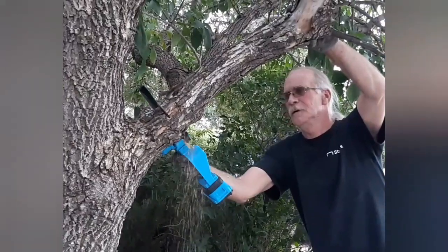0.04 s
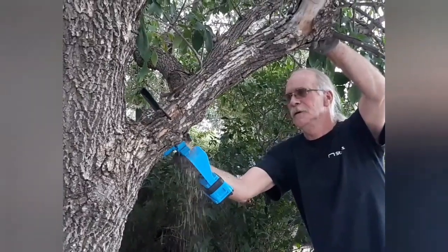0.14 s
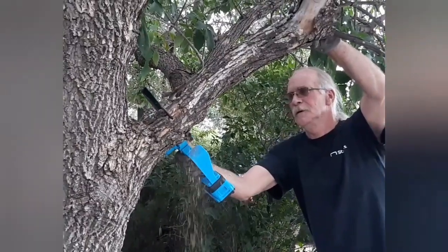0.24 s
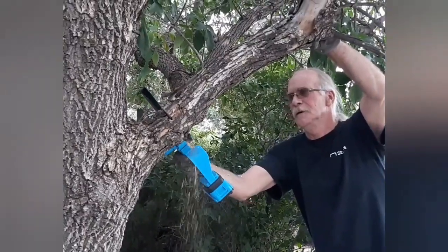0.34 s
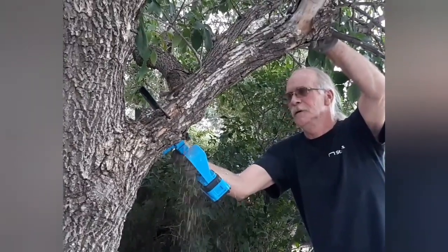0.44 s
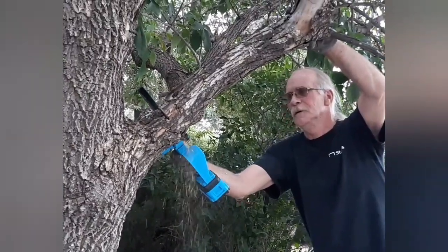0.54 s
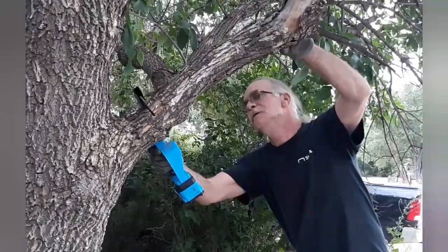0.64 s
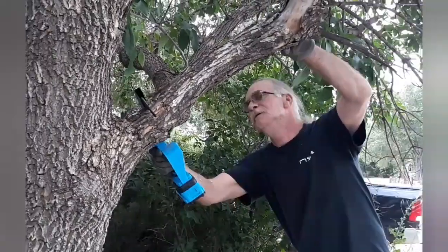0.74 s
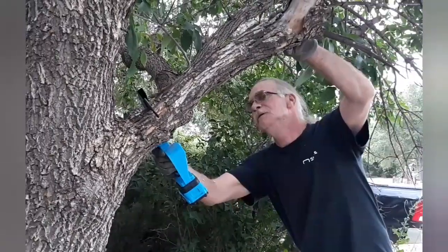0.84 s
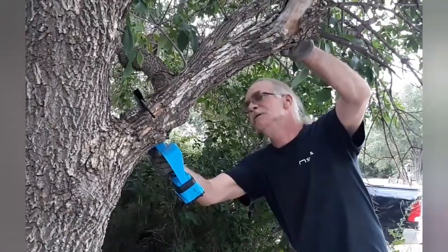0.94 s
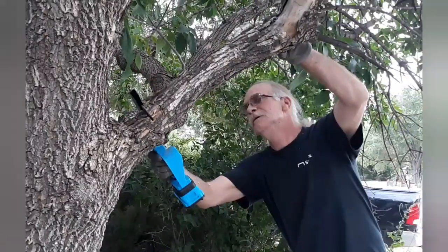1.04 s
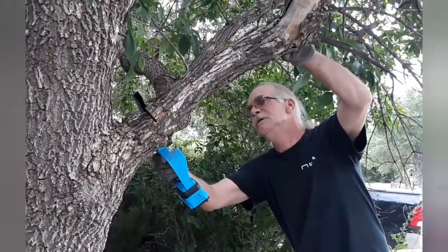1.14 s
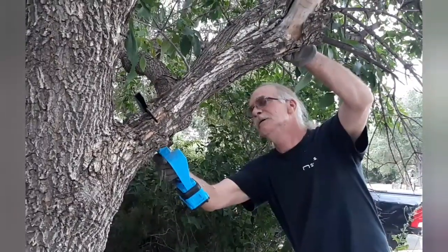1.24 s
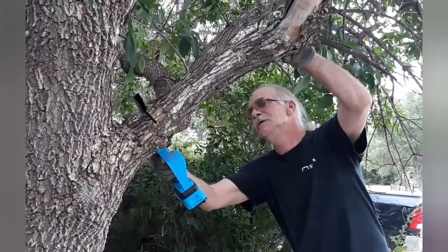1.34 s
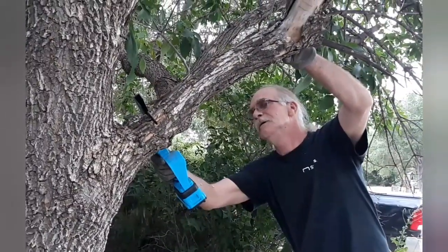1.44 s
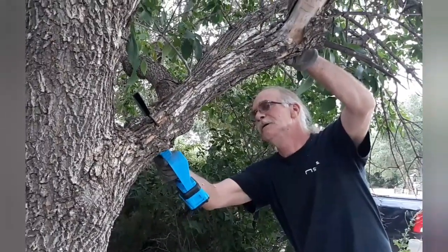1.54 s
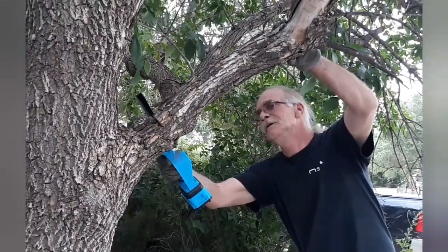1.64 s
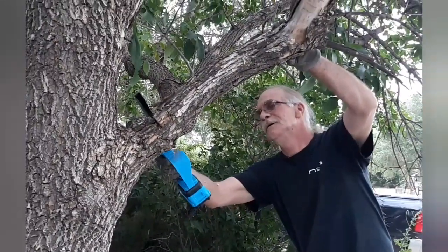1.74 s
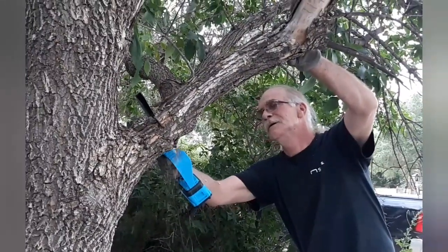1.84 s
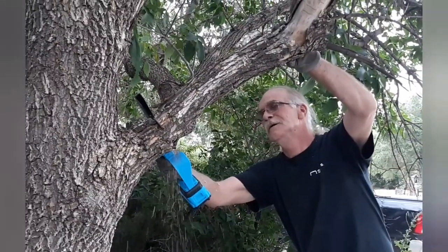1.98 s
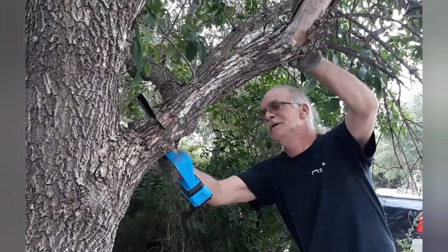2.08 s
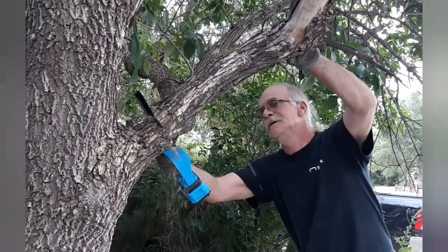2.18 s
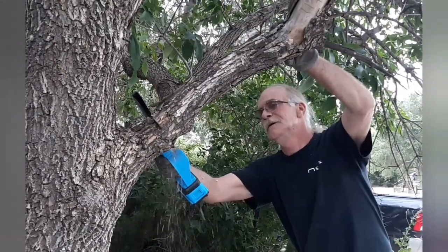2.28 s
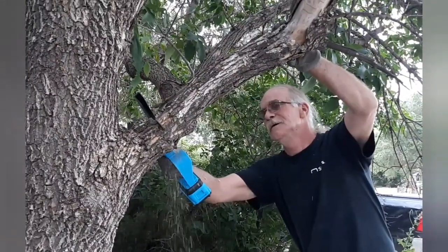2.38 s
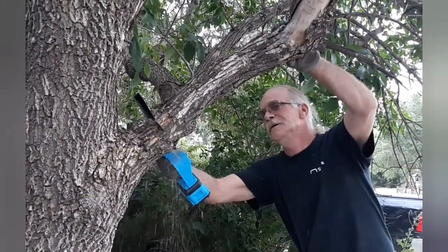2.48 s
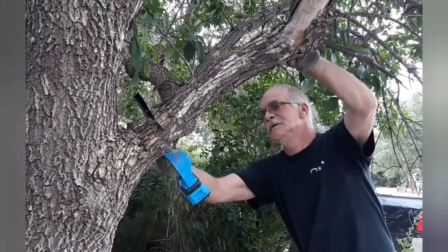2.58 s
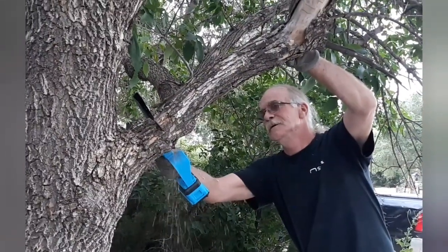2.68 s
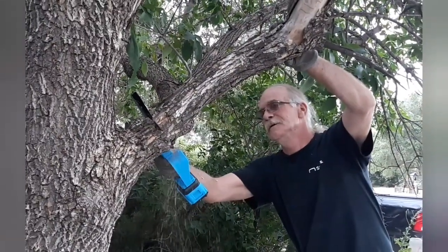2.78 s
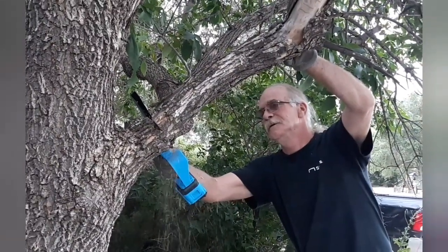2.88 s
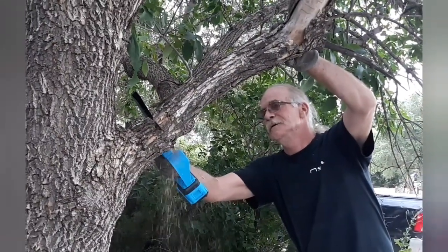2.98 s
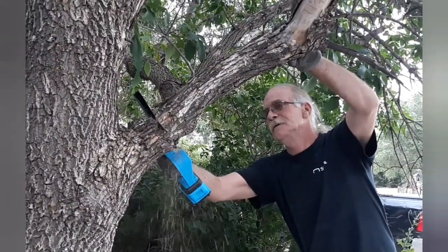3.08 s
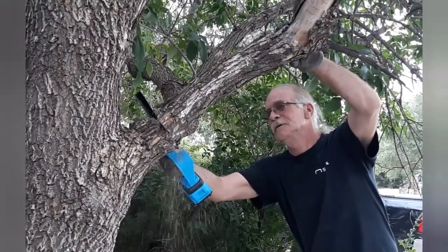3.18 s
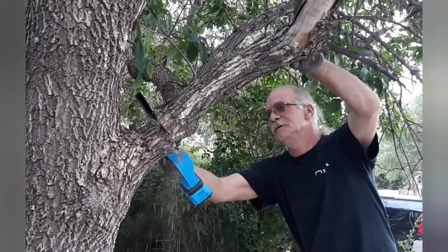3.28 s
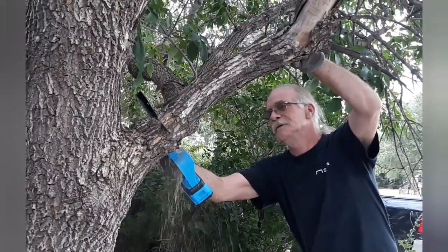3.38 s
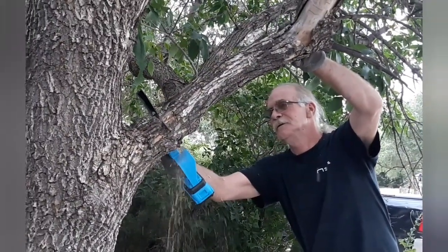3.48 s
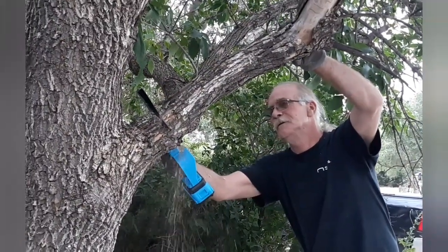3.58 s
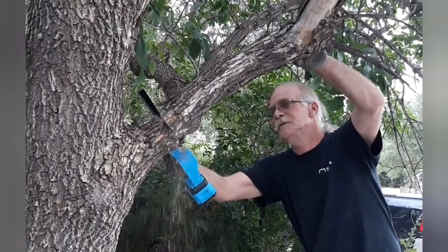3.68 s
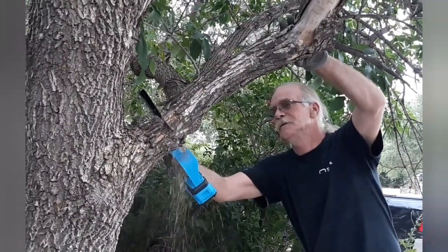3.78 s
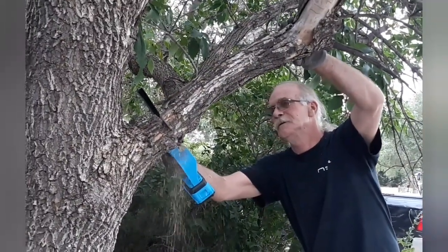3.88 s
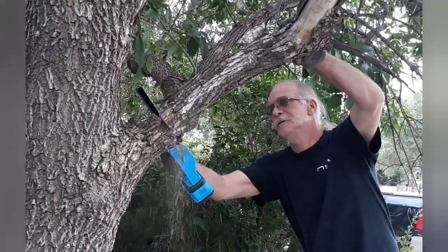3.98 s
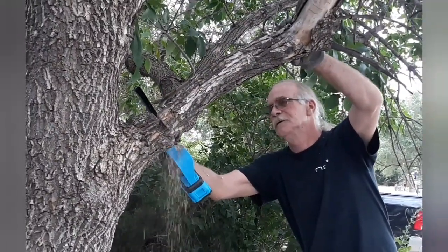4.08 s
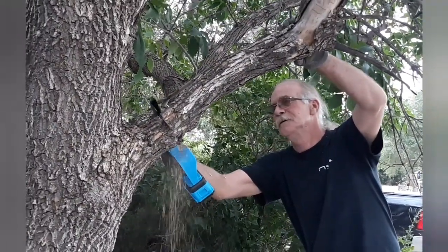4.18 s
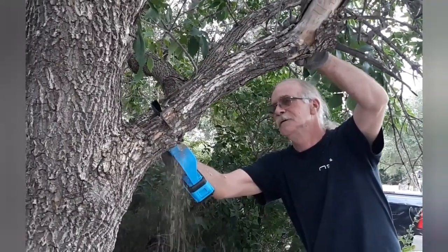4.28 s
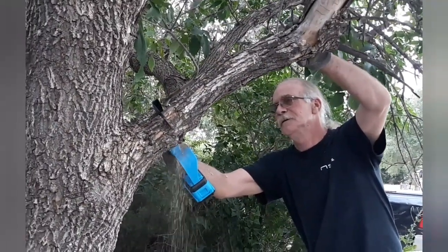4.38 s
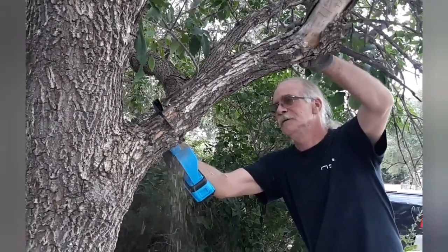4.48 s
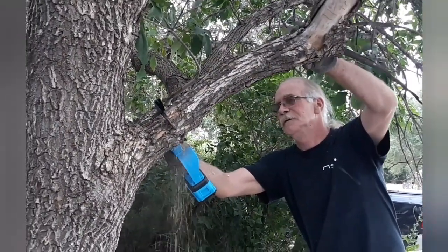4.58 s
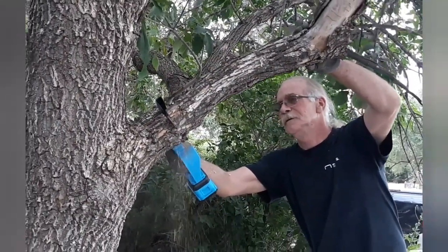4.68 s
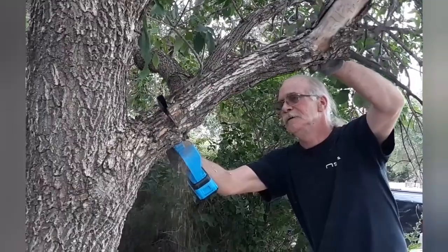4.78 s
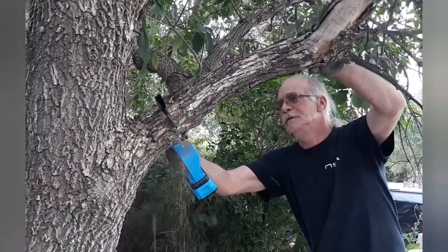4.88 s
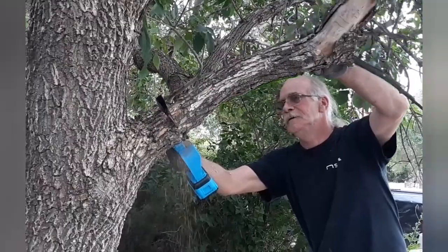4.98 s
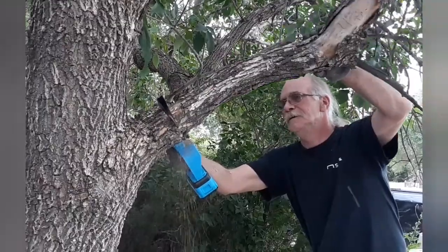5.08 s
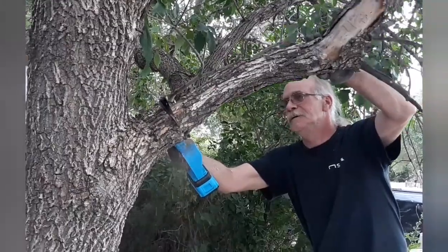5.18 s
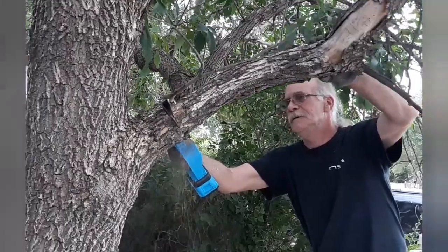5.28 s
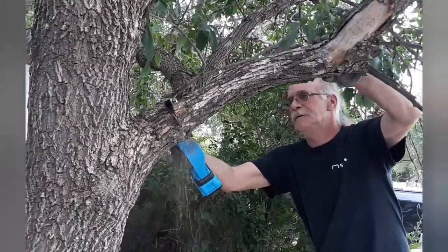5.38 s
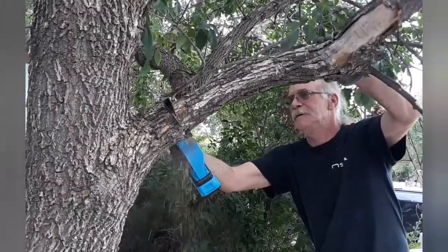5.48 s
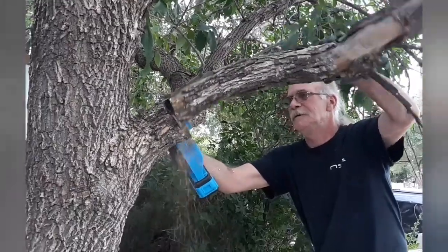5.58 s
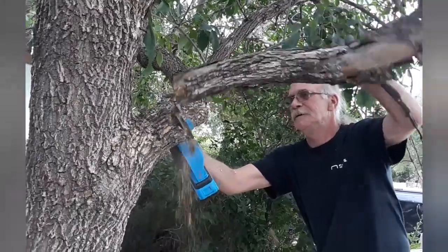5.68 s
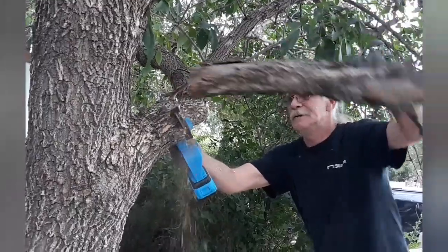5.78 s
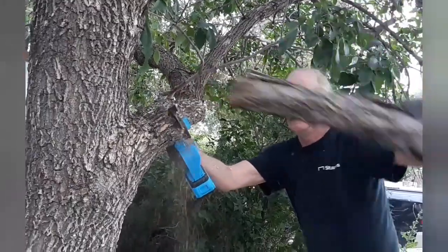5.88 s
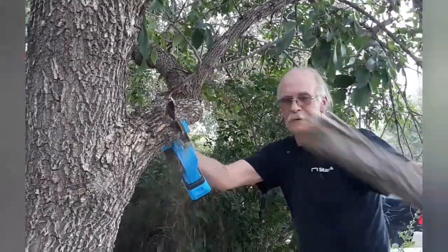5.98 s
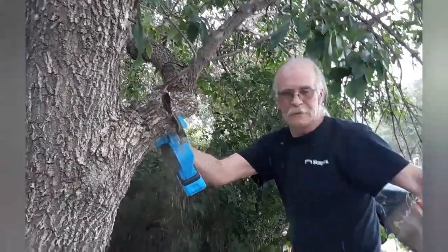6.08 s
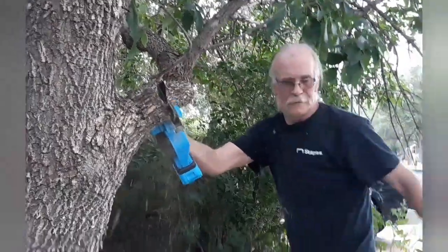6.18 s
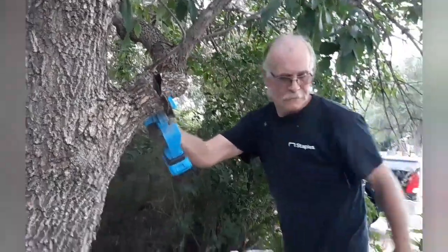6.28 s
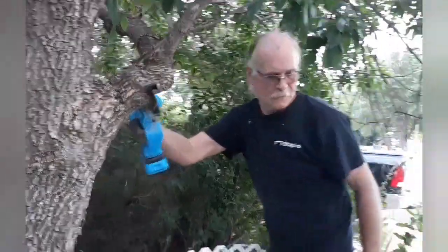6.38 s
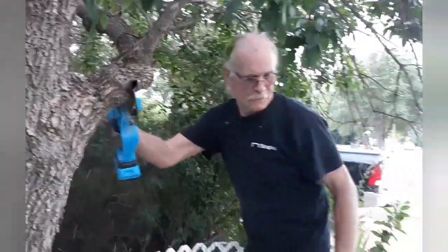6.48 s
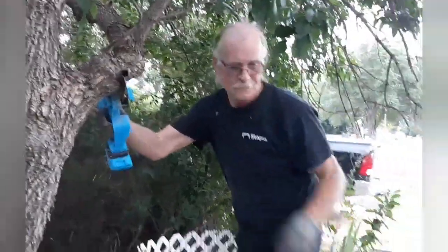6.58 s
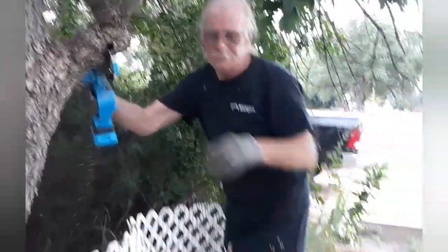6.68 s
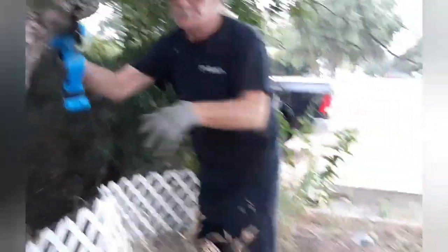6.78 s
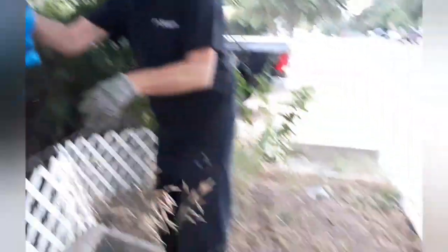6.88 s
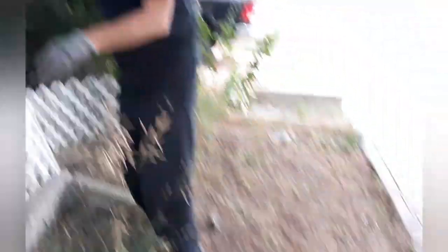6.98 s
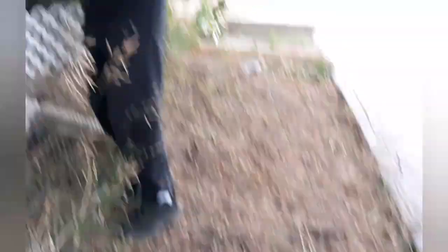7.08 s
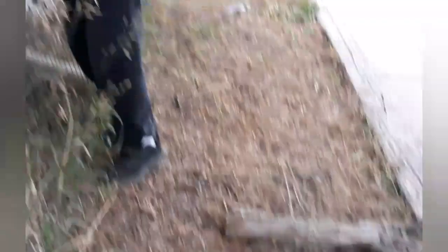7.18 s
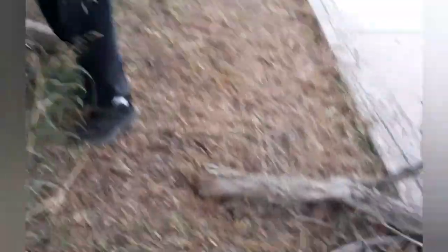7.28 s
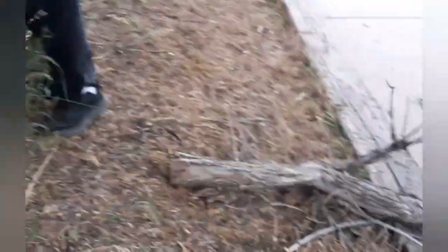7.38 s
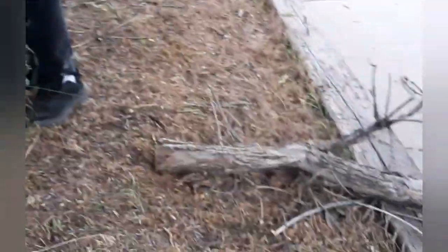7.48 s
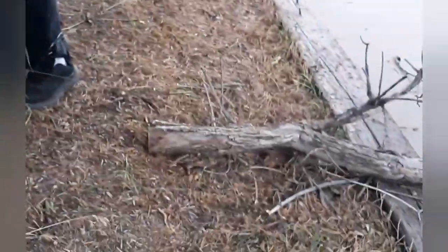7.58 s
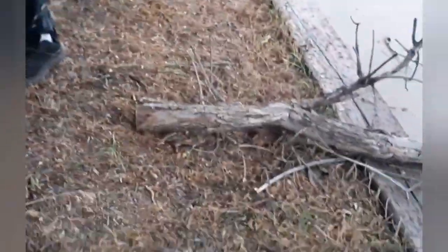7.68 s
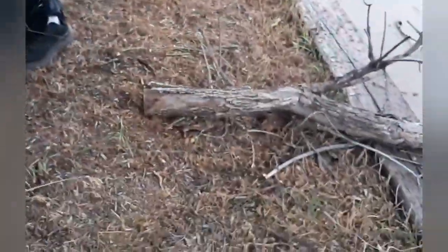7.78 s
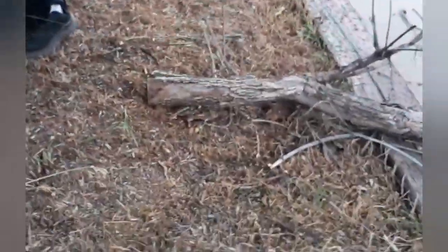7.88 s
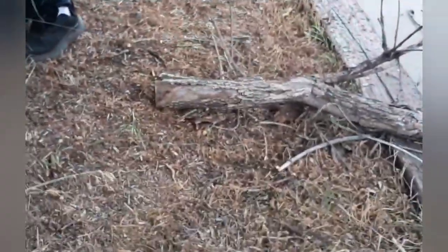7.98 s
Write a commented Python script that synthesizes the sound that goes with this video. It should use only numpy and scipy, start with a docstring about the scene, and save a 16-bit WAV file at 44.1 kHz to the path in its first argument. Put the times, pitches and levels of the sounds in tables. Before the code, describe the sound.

A small cordless saw buzzes dully, then whines and rattles through a branch, which cracks loose, crashes onto dry ground and leaves twigs ticking.

```python
"""A small battery chainsaw buzzes dully from afar, then, after a brief dip, cuts a branch from closer.
Repeated blows excite the resonances of wood, housing and bar; a gear whine sags under load.
The branch cracks free, crashes on dry ground and bounces, and its twigs tick as they settle.
Blows and twigs are filtered noise, gears are sines, thuds are decaying sines with noise.
Underneath lie a quiet outdoor floor, a low rumble and a late soft roar."""
import sys
import numpy as np
from scipy import signal
from scipy.fft import rfft, irfft
from scipy.io import wavfile
from scipy.ndimage import uniform_filter1d

SR = 44100
rng = np.random.default_rng(int(sys.argv[2]) if len(sys.argv) > 2 else 0)


def transcribe(u):
    """Save the signal u as a 16-bit wav file named by the first command-line argument.

    u: samples, shape (n,) or (channels, n), limited to [-1, 1]; the rate is SR.
    q: integer samples, one column per channel.
    """
    v = np.clip(np.atleast_2d(u).T, -1, 1)
    q = np.round(v * 32767).astype(np.int16)
    wavfile.write(sys.argv[1], SR, q)


N = 354563
TIME = np.arange(N) / SR  # [s]
HZ = np.fft.rfftfreq(4096, 1 / SR)  # filter design grid [Hz]

# All table levels are relative; the layers are trimmed where they are mixed.
# Saw from afar: (time [s], level [dB])
FAR_LEVEL = [(0.0, -22.5), (0.604, -23.5), (0.655, -47)]
# Its noise spectrum: (frequency [Hz], density [dB per Hz])
FAR_SPECTRUM = [(24, -63), (40, -45), (292, -4), (404, -11), (520, 1.5), (904, -19), (1220, -2.5),
                (1460, -14), (1780, 1), (3180, -10.5), (6590, -6.5), (7860, -18.5), (15100, -17.5),
                (16300, -28)]
# Its resonances: (frequency [Hz], width [Hz], level [dB])
FAR_MODES = [(754, 97, 4), (1120, 360, -2.5), (1710, 300, 0.5), (2240, 310, -1.5), (4640, 340, -5.5),
             (6650, 200, -17)]
# Near cut: (time [s], running chain level [dB], bite in the wood over that level [dB])
CUT = [(.652, -46.5, 5.5), (.74, -35, -1), (.79, -40, 1), (.94, -36.5, -3), (1.03, -33.5, -1.5),
       (1.12, -36.5, -4), (1.42, -36.5, -5), (1.51, -31, -4), (1.54, -33, 9.5), (1.57, -33.5, -6),
       (1.61, -31.5, 0), (1.99, -33, -0.5), (2.12, -31, 2.5), (2.6, -33, 4.5), (2.72, -36, 4.5),
       (4.29, -35.5, 6), (4.77, -35, 0.5), (5.33, -34.5, -1.5), (5.39, -32, -1.5), (5.581, -35, -1),
       (5.62, -36, -6), (6.05, -36.5, -4.5)]
# Gear speed, free near the top and sagging under load: (time [s], gear mesh frequency [Hz])
GEAR_SPEED = [(0.779, 1655), (0.931, 1850), (1.002, 1975), (1.06, 2084), (1.109, 2273), (1.169, 2325),
              (1.48, 2345), (1.524, 1960), (1.589, 2156), (1.698, 1898), (1.8, 1947), (2.052, 2010),
              (2.15, 1896), (2.3, 1846), (2.401, 1878), (2.55, 1810), (3.999, 1820), (4.281, 1880),
              (4.559, 1997), (4.649, 2100), (4.799, 2105), (4.9, 2170), (5.099, 2112), (5.38, 2070),
              (5.409, 1900), (5.52, 2124), (5.622, 2210), (5.718, 2305), (5.85, 2315), (5.949, 2390),
              (6.079, 2340)]
# Bounce rate of the bar in the kerf, held until the next row: (time [s], bounces per second [Hz])
BOUNCE_RATE = [(0, 150), (1.5, 98), (2.3, 149), (4.05, 95), (4.75, 90), (5.56, 125)]
# Kerf pinching the bar: (starts to close [s], closed [s], starts to open [s], open [s])
PINCH_TIMES = [4.1, 4.698, 5.45, 5.58]
# Noise spectrum of the wood: (frequency [Hz], density [dB per Hz])
WOOD_SPECTRUM = [(24, -79), (40, -60), (214, -14), (267, -6.5), (421, -9.5), (594, -5), (788, 3),
                 (1010, -16), (1700, -36.5), (2210, -57), (3740, -120)]
# Noise spectrum of the chain hiss: (frequency [Hz], density [dB per Hz])
HISS_SPECTRUM = [(700, -23.5), (1500, -8), (2800, -2.5), (4100, -7), (5500, -6.5), (7300, -12),
                 (8000, -10.5), (10000, -16), (11800, -8), (13000, -10.5), (15500, -7.5), (16300, -42)]
# Resonances of wood, housing and bar: (frequency [Hz], width [Hz], level [dB])
WOOD_MODES = [(840, 67, -7), (1366, 290, 3.5)]
HOUSING_MODES = [(1898, 263, 4), (2515, 250, -2), (3150, 144, -2.5), (3718, 30, -5)]
LOW_BAR_MODES = [(4990, 390, 0)]
HIGH_BAR_MODES = [(5610, 310, -9), (6177, 170, -6.5), (6770, 385, -4.5), (7280, 170, -9.5)]
# Gearbox response to the whine, best near its resonance: (mesh frequency [Hz], level [dB])
WHINE_RESPONSE = [(1650, -70), (1815, -36.5), (1870, -27.5), (1960, -25.5), (2080, -26), (2200, -28),
                  (2290, -35), (2400, -23.5)]
# Motor line at 3/2 of the mesh frequency: (time [s], level [dB])
MOTOR_LEVEL = [(.78, -50), (.88, -38), (1.05, -38), (1.25, -39), (1.33, -47), (1.48, -52), (1.58, -43),
               (1.66, -60), (5.6, -60), (5.75, -44), (5.95, -50)]
# Snags of the chain that jolt the saw: (time [s], bar ring peak [dB], bar ring frequency [Hz])
SNAGS = [(0.7312, -20, 6950), (0.7695, -21, 4700), (0.9264, -16, 6810), (0.9946, -16, 4990),
         (1.5316, -23, 4800), (2.1296, -22, 4976), (2.1683, -23.5, 6770), (2.3955, -11.5, 5180),
         (2.6172, -13, 6850), (3.21, -11.5, 4940), (3.3808, -12, 5010), (3.915, -13, 6760),
         (4.3433, -7.5, 6940), (4.78, -6.5, 6730), (4.92, -9, 6260), (5.026, -6, 6560),
         (5.1235, -3.5, 6730), (5.3785, -5.5, 6370), (5.422, -13, 5680), (5.434, -7, 5380),
         (5.4807, -6, 5530), (5.497, -10, 5600), (5.6149, -16.5, 6780), (6.0234, -14, 6500)]
# Twigs that snap and tick: (time [s], peak [dB], ring frequency [Hz])
TWIGS = [(6.0679, -8.5, 5830), (6.083, -7, 3690), (6.0995, -12, 6050), (6.118, -3.5, 6960),
         (6.1464, -7, 5740), (6.165, -14, 5340), (6.1933, -11, 2500), (6.206, -5, 10700),
         (6.226, -11, 5900), (6.2568, -10, 2540), (6.3584, -15, 1930), (6.4887, -15, 6130),
         (6.506, -17, 3200), (6.539, -24, 5630), (6.598, -17.5, 3460), (6.613, -18, 5800),
         (6.6528, -29, 6000), (6.6987, -35, 4880), (6.7361, -30, 6200), (6.781, -29, 3400),
         (6.8627, -38, 6000), (6.898, -31, 2980), (6.907, -30, 5700), (6.926, -30, 3360),
         (6.994, -39, 3290), (7.0403, -35, 3370), (7.0562, -28, 6760), (7.0633, -28, 4800),
         (7.1232, -31.5, 6200), (7.1631, -30.5, 5600), (7.2735, -40, 5400), (7.307, -41.5, 3240),
         (7.322, -39, 7000), (7.38, -46, 5000), (7.4067, -31.5, 2120), (7.4826, -30, 6370),
         (7.5256, -30.5, 4700), (7.548, -34, 4950), (7.7103, -41, 2310), (7.8027, -43, 2140),
         (7.857, -37, 2170), (7.9503, -36, 6450)]
# Thick end striking the ground:
# (time [s], peak [dB], ring frequency [Hz], 60 dB decay time [s], low push against the ring [dB])
THUDS = [(6.192, -13, 987, 0.078, -17), (6.214, -8.5, 361, 0.055, -7), (6.268, -12, 1130, 0.064, -19),
         (6.358, -23, 1130, 0.062, -25), (6.493, -35, 278, 0.052, -7), (6.511, -33, 327, 0.077, 3.5)]
# Branch landing and bouncing: (time [s], length [s], dry leaves level [dB], branch body level [dB])
LANDINGS = [(6.15, 0.12, -22, -35), (6.35, 0.073, -42.5, -63), (6.506, 0.023, -29, -44),
            (6.798, 0.022, -51, -77)]
# Noise spectra of the leaves and of the limb: (frequency [Hz], density [dB per Hz])
LEAF_SPECTRUM = [(530, -19), (900, -11), (1110, -3), (1200, 0.5), (1670, 0), (2550, -5.5), (4190, -3),
                 (5750, -5.5), (6980, -3.5), (9000, -18.5), (11800, -6.5), (15300, -12), (16300, -49)]
LIMB_SPECTRUM = [(24, -34), (40, -40), (232, -13.5), (307, -0.5), (353, -3.5), (511, -5.5), (1100, -8),
                 (1600, -5), (2080, -33), (3520, -120)]
# Noise spectrum of the outdoor floor: (frequency [Hz], density [dB per Hz])
AIR_SPECTRUM = [(30, -49), (110, -37), (250, -0.5), (550, -17), (900, -4), (1400, -23.5), (2150, -12),
                (2700, -37), (4800, -15.5), (6500, -21.5), (8000, -25.5), (11500, -29.5), (16000, -33),
                (16400, -43)]
# Low rumble that comes and goes: (time [s], level [dB])
RUMBLE_LEVEL = [(0, -60), (.4, -50), (.7, -41.5), (2.3, -43.5), (2.6, -51.5), (6.0, -72.5), (6.8, -63),
                (7.6, -69), (8.04, -48)]
# Soft roar that swells near the end: (time [s], level [dB])
ROAR_LEVEL = [(7.4, -70), (8.008, -47), (8.04, -53)]
# Likeness of the two channels: (frequency [Hz], left-right likeness [0 to 1])
LIKENESS = [(60, .98), (640, .975), (1400, .92), (3100, .72), (6000, .76), (9000, .62), (16000, .62)]
# Phase by which the saw leads on the left: (frequency [Hz], lead [rad])
SAW_LEAD = [(60, 0), (1000, 0.32), (2500, 1.3), (3400, 2.0), (4800, 0.89), (7000, 1.27), (9000, 3),
            (12000, 4.5), (16000, 4)]

BLOW_DB, FREE_BLOW_DB, PINCHED_BLOW_DB = 3, -2, 11.5  # blow over the steady rattle [dB]
STOP_S, STOP_DB_PER_S = 6.08, 55  # the trigger is let go [s] and the chain runs down [dB/s]
FREE_HZ, HUM_DB = 2280, -55  # above this mesh speed [Hz] the saw runs free and a low line shows [dB]
JAM_HZ_PER_S = -3500  # a faster drop in speed drowns the whine [Hz/s]
THROUGH_S, THROUGH_DB = 5.61, -10  # the bar comes through [s] and the whine slackens [dB]
JOLT_DB, PINCHED_JOLT_DB = -0.5, -17  # wide jolt against the bar ring [dB]
CRACK_DB = -5.5  # wide crack against the twig ring [dB]
LAND_RISE_DB_PER_S, LAND_FALL_DB_PER_S = 220, 144
SETTLE_S, SETTLE_DB_PER_S = 6.33, 30  # the litter starts to quieten [s], at this rate [dB/s]
SETTLE_LEAVES_DB, SETTLE_BODY_DB = -45, -51
REST_LEAVES_DB, REST_BODY_DB = -75, -58.5
BRANCH_LAG = 14.85  # delay of the branch on the left [samples]
EDGE_HZ = 16150  # upper band limit [Hz]


def saw():
    """Forced vibration: the same blows excite wood, housing, steel bar (hardest) and chain hiss."""
    blows = bounces(spread_db=2.4, jitter=.1)
    level_db, bite_db = chain()
    grip = pinch(TIME)
    wood = amp(read(WOOD_SPECTRUM, HZ)) + amp(-4.5) * peaks(WOOD_MODES)
    hiss = amp(read(HISS_SPECTRUM, HZ))
    # deep in the limb the low bar mode swells by 4.5 dB
    low_bar_db = -0.2 + np.interp(TIME, [2.4, 2.901, 3.95, 4.25], [0, 4.5, 4.5, 0])
    # (colour, share of the blows, puff fall [s], level over the chain [dB],
    #  share of the bite, level added when pinched [dB])
    parts = [(wood, .25, .0022, -.3, .98, .1),
             (peaks(HOUSING_MODES), .3, .0018, 7, .6, -.1),
             (peaks(LOW_BAR_MODES), 1.2, .0012, low_bar_db, .4, -3),
             (peaks(HIGH_BAR_MODES), 1.3, .0011, 5, .4, 7),
             (hiss, 0.6, .0009, 8, .01, .1)]
    near = np.zeros((2, N))
    for colour, share, fall_s, db, follow, pinched_db in parts:
        gain = amp(level_db + db + follow * bite_db + pinched_db * grip)
        near += gain * coloured(bursts(share * blows, fall_s), colour)
    far_colour = amp(read(FAR_SPECTRUM, HZ) - 3.5) + amp(-3.5) * peaks(FAR_MODES)
    far = coloured(bursts(0.27 * blows, 0.00094), far_colour)
    shake = amp(1.22 * wander(10.5))  # the hand lets the pressure waver
    return shake * (near + far * played(FAR_LEVEL, column=1))


def bounces(spread_db, jitter):
    """Impulse excitation: one uneven blow for each bounce of the bar, hardest while it is pinched."""
    s, rate = np.transpose(BOUNCE_RATE)
    stage = np.searchsorted(s, TIME, "right") - 1
    turns = np.cumsum(rate[stage] * (1 + jitter * wander(40))) / SR
    in_wood = (stage > 0) & (stage < len(s) - 1)
    loose_db = np.where(in_wood, BLOW_DB, FREE_BLOW_DB)
    size_db = loose_db + (PINCHED_BLOW_DB - loose_db) * pinch(TIME) ** 2
    size_db += spread_db * np.clip(rng.standard_normal(N), -2, 2)
    struck = np.diff(np.floor(turns), prepend=0) > 0
    return struck * amp(size_db)


def chain():
    """Driving level and bite in dB: silent before the near cut, in exponential decay after the stop."""
    s, level_db, bite_db = np.transpose(CUT)
    run_down_db = STOP_DB_PER_S * np.maximum(TIME - STOP_S, 0)
    return np.interp(TIME, s, level_db, left=-200) - run_down_db, np.interp(TIME, s, bite_db)


def pinch(s):
    """Clamping: how far the kerf grips the bar, 0 to 1."""
    return np.interp(s, PINCH_TIMES, [0, 1, 1, 0])


def whine():
    """Gear meshing: teeth radiate locked tones; the harder the bite, the more the speed wavers."""
    s, mesh_hz = np.transpose(GEAR_SPEED)
    speed_hz = np.interp(TIME, s, mesh_hz)
    level_db, bite_db = chain()
    load = np.clip(amp(level_db + bite_db + 35 + 5 * pinch(TIME)), .15, 1.5)
    throb = .008 * wander(25) + .008 * np.sin(2 * np.pi * 19.5 * TIME)
    phase = 2 * np.pi * np.cumsum(speed_hz * (1 + load * throb)) / SR
    running = (TIME > s[0]) & (TIME < s[-1])
    meshed = running & (np.gradient(speed_hz) * SR > JAM_HZ_PER_S)
    whine_db = read(WHINE_RESPONSE, speed_hz) + .45 * (level_db + 34) + THROUGH_DB * (TIME > THROUGH_S)
    gear = uniform_filter1d(meshed * amp(whine_db), size=300)
    hum = uniform_filter1d(running * (speed_hz > FREE_HZ) * amp(HUM_DB), size=3000)
    lines = gear * np.sin(phase)
    lines += played(MOTOR_LEVEL, column=1) * np.sin(phase * 3 / 2)
    lines += hum * np.sin(phase * .2255)
    return np.sqrt(2) * amp(2.3 * wander(20)) * lines * np.ones((2, 1))


def snags():
    """Impact response: jolts ring one bar mode and shake the housing, less so in a pinched kerf."""
    rows = [(s, db, hz, .04, JOLT_DB + (PINCHED_JOLT_DB - JOLT_DB) * pinch(s)) for s, db, hz in SNAGS]
    jolt, bar = knocks(rows, width=0.018, rise_s=0.00016)
    body = peaks(HOUSING_MODES) + amp(read(HISS_SPECTRUM, HZ) - 10.0)
    return amp(-2.5) * bar + amp(1.0) * shaped(jolt, body)


def branch():
    """Superposition of twigs, ground thuds, crackling leaves and bark, and the noise of the limb."""
    leaves = crash(column=2, settle_db=SETTLE_LEAVES_DB, rest_db=REST_LEAVES_DB)
    body = crash(column=3, settle_db=SETTLE_BODY_DB, rest_db=REST_BODY_DB)
    limb = body * coloured(rng.standard_normal((2, N)), amp(read(LIMB_SPECTRUM, HZ)))
    return twigs(leaves) + amp(0.5) * thuds() + amp(2.0) * crackle(leaves) + amp(-1.5) * limb


def twigs(leaves):
    """Brittle fracture: tabled snaps and 80 random small ticks, each ringing at its own pitch."""
    when, size, pitch = rng.random((80, 3)).T
    at = np.interp(when, [0, 1], (6.34, 8.0))
    small_db = 13 * np.log10(np.interp(at, TIME, leaves)) - 10.0 + 11.0 * size
    small = list(zip(at, small_db, np.interp(pitch, [0, 1], (2500, 8000))))
    rows = [(s, db, hz, .03, CRACK_DB) for s, db, hz in TWIGS + small]
    wide, rung = knocks(rows, width=0.049, rise_s=0.00096)
    return amp(-5.5) * rung + shaped(wide, amp(read(LEAF_SPECTRUM, HZ)))


def thuds():
    """Damped oscillation: the limb rings with falling pitch over a duller push of ground noise."""
    out, t = np.zeros(N + 9000), np.arange(9000) / SR
    dull = signal.butter(2, [70, 420], "band", fs=SR, output="sos")
    for s, db, hz, t60, push_db in THUDS:
        swell = amp(db - 60 * t / t60) * (1 - np.exp(-t / 0.003))
        ring = np.sin(2 * np.pi * hz * t * (1 - 0.85 * t))
        push = evened(signal.sosfilt(dull, rng.standard_normal(len(t))))
        out[round(s * SR):][:len(t)] += swell * (ring + amp(push_db) * push)
    return out[:N]


def crackle(leaves):
    """Shot noise: about 200 random grains a second, of uneven size, under a clumping slow level."""
    grains = (rng.random(N) < 200 / SR) * amp(4.4 * np.minimum(rng.exponential(1, N), 3.5))
    noise = coloured(bursts(0.5 * grains, 0.00033), amp(read(LEAF_SPECTRUM, HZ)))
    return amp(3.76 * wander(23)) * leaves * noise


def crash(column, settle_db, rest_db):
    """Energy decay of one layer: each landing rises, holds and falls; the litter settles to a rest."""
    after = TIME - SETTLE_S
    out = (after > 0) * (amp(settle_db - SETTLE_DB_PER_S * after) + amp(rest_db))
    for row in LANDINGS:
        early = np.maximum(row[0] - TIME, 0)
        late = np.maximum(TIME - row[0] - row[1], 0)
        out = out + amp(row[column] - LAND_RISE_DB_PER_S * early - LAND_FALL_DB_PER_S * late)
    return out


def air():
    """Broadband ambience: filtered noises form an outdoor floor, a low rumble and a late soft roar."""
    floor = coloured(rng.standard_normal((2, N)), amp(read(AIR_SPECTRUM, HZ)))
    rumble = coloured(rng.standard_normal((2, N)), peaks([(88, 460, 0.004)], skirt=1.84))
    roar_modes = [(315, 190, 3.5), (930, 360, -3.0)]
    roar = coloured(rng.standard_normal((2, N)), peaks(roar_modes, skirt=1.1))
    out = amp(-57.5 + 2.6 * wander(7.5)) * floor
    out += amp(-5.0) * played(RUMBLE_LEVEL, column=1) * rumble
    return out + played(ROAR_LEVEL, column=1) * roar


def knocks(rows, width, rise_s):
    """Resonant impact: a dying noise puff excites one resonance; returns wide puffs and rings."""
    wide, rung, t = np.zeros((2, N + 9000)), np.zeros((2, N + 9000)), np.arange(9000) / SR
    for s, db, hz, t60, wide_db in rows:
        puff = amp(db - 60 * t / t60) * (1 - np.exp(-t / rise_s)) * rng.standard_normal((2, len(t)))
        r = np.exp(-np.pi * width * hz / SR)  # pole radius; width is a share of the pitch
        ring = signal.lfilter([1, 0, -1], [1, -2 * r * np.cos(2 * np.pi * hz / SR), r * r], puff)
        at = round(s * SR)
        wide[:, at:at + len(t)] += amp(wide_db) * puff
        rung[:, at:at + len(t)] += ring * amp(db) / abs(ring).max()
    return wide[:, :N], rung[:, :N]


def bursts(train, fall_s):
    """Modulated noise: each click lets out a puff over a steady bed, with the slow level held even."""
    r = np.exp(-1 / (fall_s * SR))
    # a double pole swells and fades, with top 1 for a unit click
    puff = 1 + signal.lfilter([np.e * (1 - r)], [1, -2 * r, r * r], train)
    slow_level = np.sqrt(uniform_filter1d(puff ** 2, size=6000))
    return puff / slow_level * rng.standard_normal((2, N))


def peaks(modes, skirt=1.86):
    """Resonance curves: gain over frequency of a set of modes, summed in power."""
    return np.sqrt(sum(amp(db) ** 2 / (1 + (2 * (HZ - hz) / width) ** 2) ** skirt
                       for hz, width, db in modes))


def coloured(x, gain):
    """Minimum-phase filtering: a causal filter with the given gain; the pair leaves with rms 1."""
    log = np.log(np.maximum(np.r_[gain, gain[-2:0:-1]], 1e-5))
    taps = np.fft.ifft(np.exp(log - 1j * signal.hilbert(log).imag)).real
    return evened(signal.oaconvolve(x, taps[None], axes=1)[:, :N])


def shaped(wide, gain):
    """Spectral shaping at constant energy."""
    return coloured(wide, gain) * np.sqrt(np.mean(wide ** 2))


def wander(hz):
    """Low-passed random process of about rms 1, with its corner near hz."""
    knots = rng.standard_normal(int(N / SR * 400) + 2)  # 400 a second
    smooth = signal.lfilter([1], [1, -np.exp(-2 * np.pi * hz / 400)], knots)
    return np.interp(TIME, np.arange(len(knots)) / 400, evened(smooth))


def played(rows, column):
    """Amplitude envelope: gain from one dB column of a curve, silent outside it."""
    table = np.transpose(rows)
    return amp(np.interp(TIME, table[0], table[column], -200, -200))


def read(points, hz):
    """Spectral interpolation: straight lines on a log-frequency axis."""
    f, value = np.transpose(points)
    return np.interp(np.log(hz + 1), np.log(f + 1), value)


def amp(db):
    """Decibel law: level to amplitude gain."""
    return 10 ** (np.asarray(db) / 20)


def evened(x):
    """Power normalisation: scales to rms 1."""
    return x / np.sqrt(np.mean(x ** 2) + 1e-20)


def placed(pair, lead):
    """Partial coherence: two close ports share a sound with phase lead(Hz); the right adds its own."""
    hz = np.fft.rfftfreq(N + 5, 1 / SR)
    same = np.clip(read(LIKENESS, hz), 0, 1)
    shared, own = rfft(pair, N + 5)
    right = same * shared * np.exp(-1j * lead(hz)) + np.sqrt(1 - same ** 2) * own
    return np.array([pair[0], irfft(right, N + 5)[:N]])


def scene():
    """Stereo superposition: phase and slight level differences place the saw and the branch."""
    tool = placed(saw() + whine() + snags(), lambda hz: read(SAW_LEAD, hz))
    fallen = placed(branch(), lambda hz: -2 * np.pi * hz * BRANCH_LAG / SR)
    background = placed(air(), np.zeros_like)
    return tool * amp([[-.2], [.2]]) + fallen * amp([[.3], [-.3]]) + background


def record(dry):
    """Band limitation: the microphone drops the deep bass, and a low-pass cuts the top."""
    thin = signal.sosfilt(signal.butter(2, 75, "high", fs=SR, output="sos"), dry)
    low_pass = signal.firwin(511, EDGE_HZ, window=("kaiser", 9), fs=SR)
    return signal.oaconvolve(thin, low_pass[None], "same")


dry = scene()
out = record(dry)
transcribe(out)
```